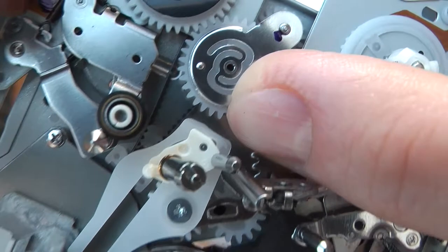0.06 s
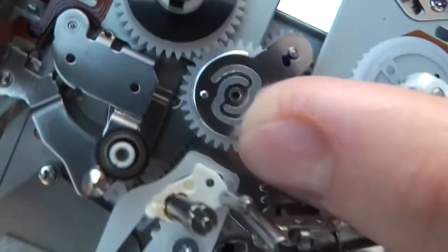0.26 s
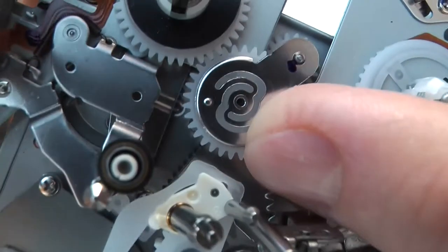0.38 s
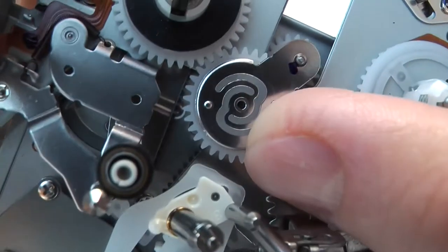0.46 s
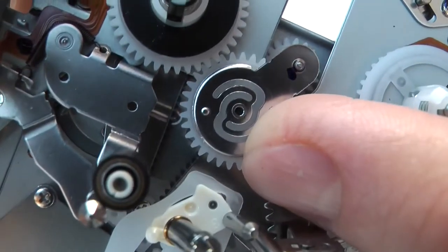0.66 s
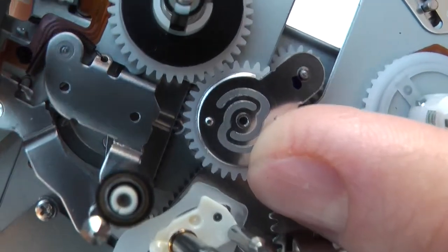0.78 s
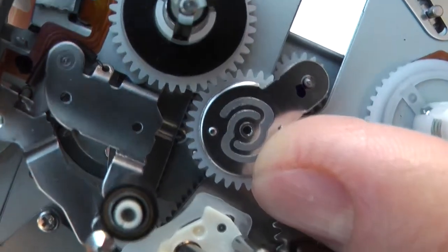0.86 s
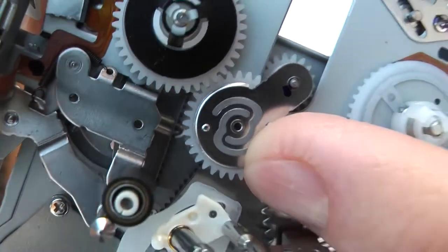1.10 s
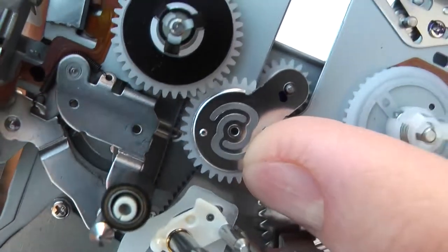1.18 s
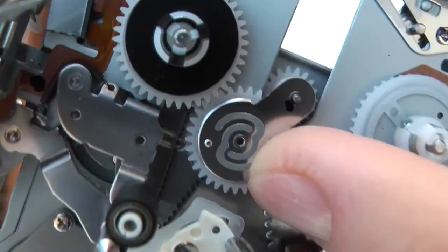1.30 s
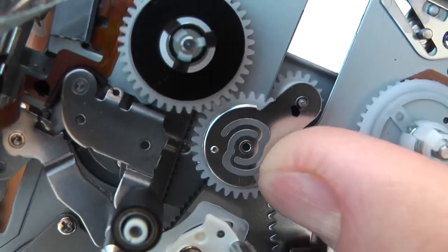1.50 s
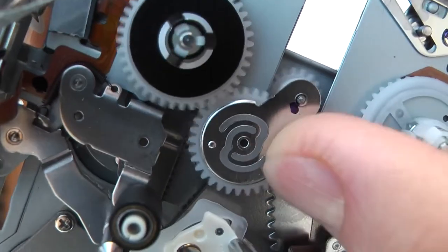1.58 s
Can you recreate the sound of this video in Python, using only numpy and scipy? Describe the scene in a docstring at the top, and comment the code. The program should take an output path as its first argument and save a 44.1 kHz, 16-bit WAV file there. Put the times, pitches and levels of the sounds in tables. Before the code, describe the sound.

Small gears clicking and rattling, very close, in a quiet hissy room with faint hum and whine. A light tick and scrape come at 0.2 s, then a dense hollow clatter from 0.34 to 0.5 s, loudest near 0.4. Looser clicks and rubbing run from 0.6 to 0.9 s. A brief rising squeak at 0.95 leads to a crisp double lever snap around 1.0 s. Then just hiss, with a barely audible far tick near 1.58.

```python
"""Room hiss with a faint hum and whine and a few far ticks; then a thumb turns the small gear train of an
opened camcorder, right under the microphones. Teeth click into the metal chassis and a sprung lever snaps,
both as decaying modes; parts rub in stick-slip grains and whistle in narrow resonances. Each jolt shakes a
hollow case resonance near 1 kHz that reaches the two microphones in opposite phase."""
import sys
import numpy as np
from scipy import signal
from scipy.fft import rfft, irfft
from scipy.io import wavfile
from scipy.ndimage import uniform_filter1d

SR = 44100
rng = np.random.default_rng(int(sys.argv[2]) if len(sys.argv) > 2 else 0)


def ratio(d):
    """dB to gain"""
    e = np.asarray(d, float) / 20
    return 10 ** e


def materialize(psi):
    """Save the field psi as 16-bit PCM at rate SR to the path in sys.argv[1].

    A 1-D psi becomes a single channel; in a 2-D psi each row is a channel.
    """
    bounded = np.clip(np.atleast_2d(psi).T, -1, 1)
    quanta = np.round(bounded * 32767).astype(np.int16)
    wavfile.write(sys.argv[1], SR, quanta)


N = 72765
TILT_HZ = 3000  # pivot of all spectral tilts


def read(points, hz):
    """Interpolates a table of (Hz, value) along log frequency."""
    f, value = np.transpose(points)
    return np.interp(np.log(hz + 1), np.log(f + 1), value)


def evened(x):
    """Scales to an rms of 1."""
    return x / np.sqrt(np.mean(x ** 2) + 1e-20)


def peaked(x, db):
    """Scales so that the loudest 30 samples have the power of a sine of peak level db."""
    return ratio(db) * x / np.sqrt(2 * uniform_filter1d(x ** 2, size=30).max())


def add(mix, s, sound):
    """Adds a sound from second s, cut at the end of the mix."""
    part = mix[round(s * SR):][:len(sound)]
    part += sound[:len(part)]


def band(x, low_hz, high_hz, order=2):
    """Butterworth band-pass."""
    return signal.sosfilt(signal.butter(order, [low_hz, high_hz], "band", fs=SR, output="sos"), x)


def smoothed_noise(shape, size):
    """Slow random curve: noise averaged twice over size samples, at an rms of 1."""
    once = uniform_filter1d(rng.standard_normal(shape), size=size)
    return evened(uniform_filter1d(once, size=size))


def shifting(x):
    """The sound times a quick random sign and size: alike in colour, unrelated in phase."""
    shift_s = .002
    return x * smoothed_noise(N, round(shift_s * SR))


def rings(modes, size=3000):
    """One decaying sine for each mode."""
    hz, db, t60_s = np.transpose(modes)[:, :, None]
    t = np.arange(size) / SR
    return ratio(db - 60 * t / t60_s) * np.sin(2 * np.pi * hz * t)


def ringing(x, hz, t60_s):
    """A driven mode that follows the curve hz: shift down to zero, smooth, shift back."""
    turn = np.exp(2j * np.pi * np.cumsum(hz * np.ones(len(x))) / SR)
    smooth = signal.lfilter([1], [1, -ratio(-60 / t60_s / SR)], x / turn + 1e-18)
    return (turn * smooth).real


def grains():
    """Dense tiny impacts of uneven size and random sign."""
    grains_per_s, spread_db = 6000, 2.0
    size = ratio(spread_db * np.minimum(rng.exponential(1, N), 5))
    return size * rng.choice([-1, 1], N) * (rng.random(N) < grains_per_s / SR)


# Colour of the room hiss. Each row: frequency in Hz, relative density in dB per Hz.
HISS_COLOUR = [(15, -53), (35, -30), (65, -19), (85, 1), (120, -2), (200, -3), (520, -5.5), (620, -10),
               (1000, -10), (1370, -16.5), (2000, -19), (2300, -13.5), (2700, -18.5), (3400, -18.5),
               (4300, -25.5), (4850, -24), (5500, -27), (9000, -30.5), (11000, -28), (14000, -31),
               (16000, -34)]
# Left-right likeness of the hiss. Each row: frequency in Hz, correlation from 0 to 1.
HISS_LIKENESS = [(60, 0.19), (130, 0), (290, 0.063), (640, 0.12), (1410, 0.42), (3100, 0.71), (6820, 0.98),
                 (15000, 0.952)]
# Hum and whine lines. Each row: frequency in Hz, level in dB rms before wavering.
HUM_LINES = [(25, -81.5), (49.5, -74), (83.5, -74.5), (150.5, -72.5), (556, -86.5), (930, -80),
             (1115, -82.5), (1674, -86.5), (1825, -86.5), (2230, -81), (2880, -85.5), (3418, -87),
             (4883, -87)]


def room():
    """Hiss of room and microphones, partly shared by both sides, with wavering hum and whine lines."""
    hiss_db_rms = -63
    waver, wander = .5, .0012  # relative swing of level and of frequency
    frames, hz = N // 1024 + 5, np.fft.rfftfreq(4096, 1 / SR)
    a, b, c, d = rng.standard_normal((frames, 2049, 4)).T
    same = np.clip(read(HISS_LIKENESS, hz), -1, 1)[:, None]
    left = a + 1j * b
    right = same * left + np.sqrt(1 - same ** 2) * (c + 1j * d)
    spectra = np.array([left, right]) * ratio(read(HISS_COLOUR, hz))[:, None]
    hiss = signal.istft(spectra, nperseg=4096, noverlap=3072)[1][:, :N]
    out = ratio(hiss_db_rms) * evened(hiss)
    for line_hz, db in HUM_LINES:
        slow = smoothed_noise((2, N), 1500)
        turns = np.cumsum(line_hz * (1 + wander * slow[0])) / SR + rng.random()
        swing = 1 + waver * min(line_hz / 400, 1) * slow[1]  # low lines waver less
        out = out + ratio(db) * np.sqrt(2) * swing * np.sin(2 * np.pi * turns)
    return out


# Faint far ticks. Each row: start in seconds, peak level in dB, centre in Hz, decay constant in seconds.
FAR_TICKS = [(0.047, -57, 9300, 0.0031), (0.043, -70, 20000, 0.0033), (1.585, -55, 934, 0.0046),
             (1.556, -67, 9200, 0.015)]


def ticks():
    """Very faint taps somewhere else in the room: decaying puffs of noise around a centre pitch."""
    out = np.zeros(N)
    for s, db, hz, decay_s in FAR_TICKS:
        t = np.arange(0, 3 * decay_s, 1 / SR)
        noise = uniform_filter1d(rng.standard_normal(2000), size=12)[:len(t)]
        puff = noise * np.sin(2 * np.pi * hz * t)
        add(out, s, peaked(puff * np.exp(-t / decay_s), db))
    return out


# Rubbing of gears and levers. Each row: start in seconds, end in seconds, start level in dB,
# end level in dB, treble edge in Hz, case shake in dB relative to the stroke.
RUB_STROKES = [(0.2132, 0.233, -48.5, -81, 12900, 3.5), (0.266, 0.351, -60.5, -66.5, 8200, -2.5),
               (0.34, 0.363, -46.5, -66.5, 8300, 4), (0.362, 0.386, -55, -46.5, 8960, 6),
               (.385, 0.417, -45.5, -46.5, 13500, 5), (0.418, 0.427, -57, -63, 6500, 6),
               (0.43, 0.471, -54, -55, 6140, 11), (0.472, 0.513, -58, -70, 6500, 11.5),
               (0.589, 0.605, -51.5, -60, 3570, 2), (0.615, 0.69, -52.5, -66, 6500, 5.5),
               (0.696, 0.735, -55, -55, 6030, 12.5), (0.737, 0.794, -49.5, -49.5, 6910, 12.5),
               (0.795, 0.89, -48.5, -55, 6800, 12.5), (0.89, 0.939, -69.5, -57, 6500, 21),
               (0.936, 0.976, -54, -50.5, 7060, 16), (.977, 1.013, -40, -52, 13500, 2.5),
               (1.014, 1.049, -47, -72.5, 9300, -4)]


def strokes():
    """Level, treble edge and case shake of the rubbing, sample by sample."""
    fade_s = 0.0044  # fade-out; the fade-in takes a quarter of it
    t, level, edge_hz, case_db = np.arange(N) / SR, np.zeros(N), np.ones(N), np.zeros(N)
    for start, end, db0, db1, edge, shake_db in RUB_STROKES:
        ramp = np.minimum(4 * (t - start), end - t + fade_s / 2) / fade_s
        level += ratio(np.interp(t, [start, end], [db0, db1])) * np.clip(ramp, 0, 1)
        edge_hz[t > start - fade_s] = edge
        case_db[t > start] = shake_db
    return level, edge_hz, case_db


def rumble(level, case_db):
    """Low noise that rises with the shaking, independent at the two microphones."""
    low_hz, width_hz, rumble_db = 82, 580, -11.5
    shake = rng.standard_normal((2, N)) * level * ratio(case_db / 2 + rumble_db)
    return band(shake * np.sqrt(SR / 2 / width_hz), low_hz, low_hz + width_hz)


# Chassis modes. Each row: frequency in Hz, relative level in dB, t60 in seconds.
CHASSIS_MODES = [(1290, -11.5, 0.019), (1566, -11, 0.034), (1770, -10.5, 0.022), (2210, 0, 0.021),
                 (2692, 4, 0.0091), (2970, 2.5, 0.0076), (3873, 1.5, 0.0069), (4330, -1, 0.0075),
                 (4823, -3, 0.014), (5430, 0.5, 0.0073), (5920, -3.5, 0.0086), (6500, -4.5, 0.005),
                 (7630, -3.5, 0.005), (8180, -5, 0.0049), (9855, -2, 0.0046), (11370, -10, 0.0067),
                 (13000, -8, 0.0036)]
CHASSIS_HZ = np.array(CHASSIS_MODES)[:, 0]


def chassis_rub(level, edge_hz):
    """Stick and slip: grains come in little bursts and excite the chassis modes."""
    slips_per_s, slip_s, slip_depth = 250, .0012, .75
    tilt_db_per_octave, edge_db_per_octave, above_edge_db = 1, -42, -16  # falls to a shelf above the edge
    slips = (rng.random(N) < slips_per_s / SR) * rng.exponential(1, N)
    slip_decay = np.exp(-np.arange(400) / SR / slip_s)
    bursts = evened(1 + slip_depth * evened(np.convolve(slips, slip_decay)[:N]))
    drives = [evened(grains()) * bursts * level for _ in range(5)]
    ring, out = rings(CHASSIS_MODES), np.zeros(N)
    for k, hz in enumerate(CHASSIS_HZ):
        treble_db = np.clip(edge_db_per_octave * np.log2(hz / edge_hz), above_edge_db, 0)
        lean_db = tilt_db_per_octave * np.log2(hz / TILT_HZ) + treble_db
        out += signal.oaconvolve(drives[k % 5] * ratio(lean_db), ring[k])[:N] / np.linalg.norm(ring)
    return band(out, 860, 22000)


# Narrow resonances under fast rubbing. Each row: start in seconds, end in seconds, start frequency in Hz,
# end frequency in Hz, level in dB rms before the swell.
WHISTLE_GLIDES = [(.925, .975, 2020, 2540, -52.5), (.935, .972, 4150, 4900, -49),
                  (.94, .972, 5800, 7000, -53.5), (0.94, 0.987, 13100, 13100, -61)]


def whistles():
    """Fast rubbing keeps a few narrow resonances singing; some rise with the speed."""
    t60_s = .005
    t, out = np.arange(N) / SR, np.zeros(N)
    for start, end, hz0, hz1, db in WHISTLE_GLIDES:
        swell = np.sin(np.pi * np.clip((t - start) / (end - start), 0, 1)) ** .5
        song = ringing(grains(), np.interp(t, [start, end], [hz0, hz1]), t60_s)
        out += ratio(db) * swell * evened(song)
    return out


# Main case mode, moved by the pressure of the thumb. Each row: time in seconds, frequency in Hz.
CASE_GLIDE = [(.34, 986), (.39, 990), (.412, 883), (.46, 914), (.478, 950), (.6, 903), (.7, 990),
              (.75, 936), (.78, 980), (.83, 865), (.97, 866), (.985, 664)]


def case_hz(t):
    """Frequency of the main case mode at time t."""
    return np.interp(t, *np.transpose(CASE_GLIDE))


# Case modes. Each row: multiple of the main mode, relative level in dB, t60 in seconds.
CASE_MODES = [(.85, 4, 0.018), (1, 14, 0.034), (1.14, 9, 0.032), (1.28, 3, 0.022)]


def case_modes_at(main_hz):
    """The case modes with their multiples turned to Hz."""
    return np.array(CASE_MODES) * [main_hz, 1, 1]


def case_shake(level, case_db):
    """Rubbing grains excite the case modes as they glide."""
    drive = evened(grains()) * level * ratio(case_db)
    main_hz = case_hz(np.arange(N) / SR)
    out = sum(ratio(db) * ringing(drive, k * main_hz, t60_s) for k, db, t60_s in CASE_MODES)
    return out / np.linalg.norm(rings(case_modes_at(main_hz[0])))


# Jolts into the case. Each row: start in seconds, peak level in dB before the case band-pass,
# push length in ms (at least 0.3 is used).
CASE_JOLTS = [(0.3406, -29, 2.1), (0.3463, -32, 1.57), (0.3676, -24, 0.89), (0.372, -23.5, 1.7),
              (0.3817, -22, 2.8), (0.3943, -34, 0.9), (0.404, -19.5, 1.35), (0.4139, -25.5, 1.5),
              (0.437, -29.5, 1.7), (0.4425, -23, 2.3), (0.4539, -31, 1.5), (0.4628, -22.5, 0.79),
              (0.476, -20.5, 2.7), (0.594, -35, 3.3), (0.6998, -29.5, 1.4), (0.705, -34, 1.7),
              (0.7165, -31, 1.7), (0.7392, -28, 2.5), (0.7511, -31, 1.4), (0.7709, -23, 2.2),
              (0.7771, -35, 0.92), (0.7935, -29, 1.3), (0.798, -25, 0.74), (0.8068, -34, 1.3),
              (0.9084, -46, 1.6), (0.9193, -29.5, 2.1), (0.9283, -24, 0.82), (0.9841, -33, 0.64),
              (0.9929, -29, 1.4), (0.9993, -27.5, 0.72)]


def jolts():
    """A soft push, roughly in step with the case, sets it ringing."""
    scatter_db = 2.5  # each blow strikes the modes a little differently
    out = np.zeros(N)
    for s, db, push_ms in CASE_JOLTS:
        t, main_hz = np.arange(0, max(push_ms, .3) / 1000, 1 / SR), case_hz(s)
        share = ratio(scatter_db * rng.standard_normal(len(CASE_MODES)))
        push = np.sin(np.pi * t / t[-1]) * np.sin(2 * np.pi * main_hz * t + rng.standard_normal())
        add(out, s, peaked(np.convolve(push, share @ rings(case_modes_at(main_hz))), db))
    return out


# Lever modes. Each row: frequency in Hz, relative level in dB, t60 in seconds.
LEVER_MODES = [(1800, -9, .012), (2750, 3, .009), (3710, -9, .018), (5190, -8, .007), (6120, -3, .008),
               (7500, -2, .009), (10300, -6, .004)]
# Lever snaps. Each row: start in seconds, peak level in dB of the first blow, tilt in dB per octave.
LEVER_SNAPS = [(.9915, -31, 14), (1.0175, -29, 2)]


def snaps():
    """A sprung lever snaps home and rings with its own modes, then bounces once."""
    bounce_s, bounce_db = .0011, -1
    out, ring = np.zeros(N), rings(LEVER_MODES)
    octaves = np.log2(np.array(LEVER_MODES)[:, 0] / TILT_HZ)
    for s, db, tilt_db in LEVER_SNAPS:
        share = ratio(tilt_db * octaves + rng.standard_normal(len(LEVER_MODES)))
        blow = peaked(share @ ring, db)
        add(out, s, blow)
        add(out, s + bounce_s, ratio(bounce_db) * blow)
    return out


# Tooth and lever clicks. Each row: start in seconds, peak level in dB, tilt in dB per octave,
# contact time scale in ms (the push is strongest at half of it).
TOOTH_CLICKS = [(0.2115, -39.5, 4, 0.47), (0.2158, -44.5, 13, 0.3), (0.218, -49.5, -30, 2.7),
                (0.2698, -49.5, -8, 0.29), (0.3398, -45.5, -17, 0.3), (0.343, -52, -9, 0.44),
                (0.367, -34, -12, 0.44), (0.3718, -34.5, -7.5, 1.3), (0.384, -32.5, 0, 0.28),
                (0.3859, -35, -11, 0.67), (0.391, -34, 4.5, 1.5), (0.3972, -32, 5, 0.31),
                (0.4043, -24.5, 3, 0.38), (0.4114, -42, -27, 1), (0.4214, -46, -6.5, 1.7),
                (0.4399, -36, -6, 0.64), (0.4429, -35.5, -13, 0.82), (0.4592, -40.5, -11.5, 0.54),
                (0.4748, -39, -4, 0.34), (0.4773, -38.5, -18, 0.85), (0.534, -57, -12, 0.95),
                (0.6191, -38.5, -1, 0.15), (0.6263, -48.5, -8, 0.44), (0.6476, -50, -7, 0.58),
                (0.6572, -46, -3.5, 0.42), (0.681, -48.5, -7, 0.68), (0.6995, -34.5, -6.5, 0.61),
                (0.7384, -41, 6, 0.39), (0.7511, -40.5, 5, 0.37), (0.7512, -35, -16, 1.26),
                (0.7703, -32, -8.5, 0.74), (0.7757, -39, -1, 0.15), (0.7855, -45, -6, 0.17),
                (0.7922, -38, -8, 0.34), (0.7949, -39, -5, 1), (0.9181, -47, -4.5, 0.5),
                (0.927, -48, -4.5, 0.5), (0.9333, -61, -5, 0.23), (0.938, -49, -5, 0.29),
                (0.944, -41, -7, 0.3), (0.976, -34, 1, 0.41), (0.9868, -36, -3, 0.46),
                (1.0015, -37.5, -12, 0.64)]


def clicks():
    """A brief rough contact rings the chassis modes."""
    scatter_db = 2.5  # each blow strikes the modes a little differently
    out, ring, octaves = np.zeros(N), rings(CHASSIS_MODES), np.log2(CHASSIS_HZ / TILT_HZ)
    n = np.arange(300)
    signs = (-1) ** np.arange(len(ring))
    for s, db, tilt_db, contact_ms in TOOTH_CLICKS:
        share = ratio(tilt_db * octaves + scatter_db * rng.standard_normal(len(ring)))
        u = n / SR * 1000 / max(contact_ms, .05)
        push = rng.standard_normal(300) * u * np.exp(-2 * u)
        heard = abs(np.exp(-2j * np.pi * np.outer(CHASSIS_HZ, n) / SR) @ push)
        share = share / np.sqrt(heard + 1e-9)  # halves the push's own colour in dB
        blow = np.convolve(push, share * signs @ ring)
        add(out, s, peaked(band(blow, 1760, 14100), db))
    return out


def case_pair(case):
    """The case reaches the microphones in opposite phase, with a small share in phase as parts move."""
    left_db, right_db, loose_db = -.5, -4.3, -18
    case = band(case, 527, 1320)
    opposed = case * np.array([[ratio(left_db)], [-ratio(right_db)]])
    return ratio(loose_db) * shifting(case) + opposed


# Balance of the chassis sound. Each row: frequency in Hz, left minus right in dB.
CHASSIS_BALANCE = [(1300, 2.0), (2400, 3.0), (4400, -.4), (8000, .6), (14000, 1.1)]


def pair(x):
    """Two microphones hear a balance by pitch, a shifting difference and a short room tail."""
    wide_db, room_db, room_t60_s = -13, -10, 0.025
    t = np.arange(6000) / SR
    tail = rng.standard_normal((2, 6000)) * ratio(-60 * t / room_t60_s) * (t > .002)
    taps = ratio(room_db) * tail / np.linalg.norm(tail[0])
    difference = ratio(wide_db) * shifting(x) * [[1], [-1]]
    both = x + difference + signal.oaconvolve(x[None], taps, axes=1)[:, :N]
    half_db = read(CHASSIS_BALANCE, np.fft.rfftfreq(N, 1 / SR)) / 2
    return irfft(rfft(both, axis=1) * ratio(np.array([half_db, -half_db])), N, axis=1)


def scene():
    """Sums the room, the case, and the chassis with all that strikes and rubs it."""
    level, edge_hz, case_db = strokes()
    rub = chassis_rub(level, edge_hz)
    case = case_shake(level, case_db)
    low = rumble(level, case_db)
    shaken = case_pair(case + jolts())
    mechanism = rub + whistles() + clicks() + snaps() + ticks()
    return pair(mechanism) + shaken + low + room()


def top_cut(x):
    """Nothing passes above the cut-off."""
    return signal.sosfilt(signal.butter(12, 15900, fs=SR, output="sos"), x)


def record(dry):
    """The microphones roll off at the very top."""
    mic_top_hz = 15000
    soft = signal.sosfilt(signal.butter(6, mic_top_hz, fs=SR, output="sos"), dry)
    return top_cut(soft)


dry = scene()
out = record(dry)
materialize(out)
```